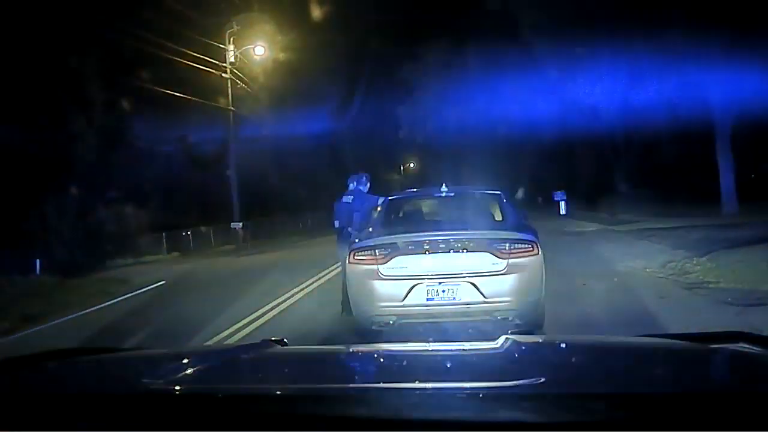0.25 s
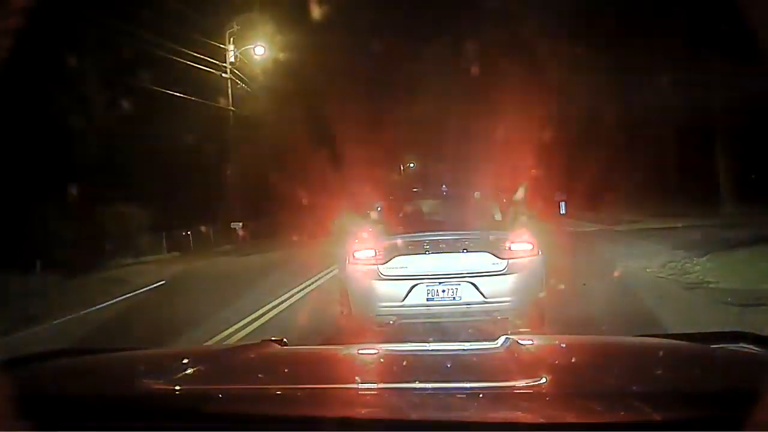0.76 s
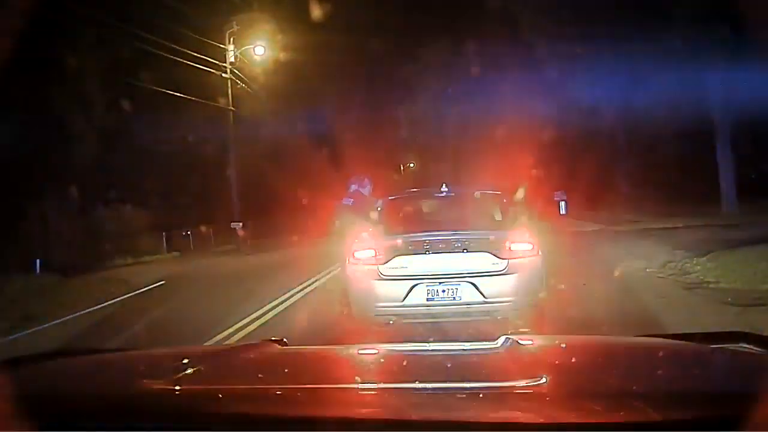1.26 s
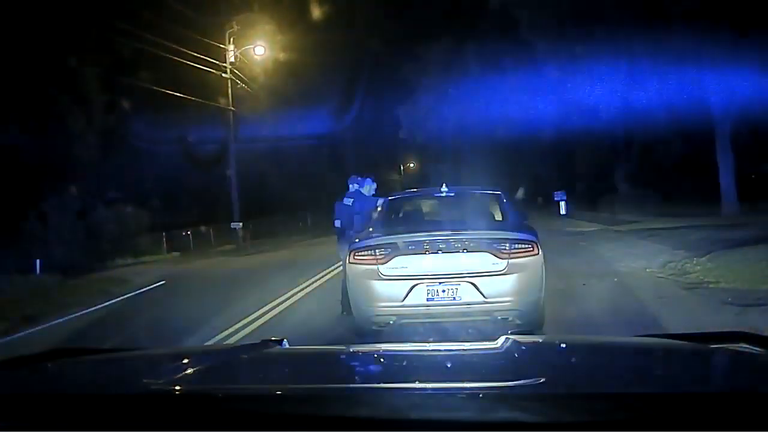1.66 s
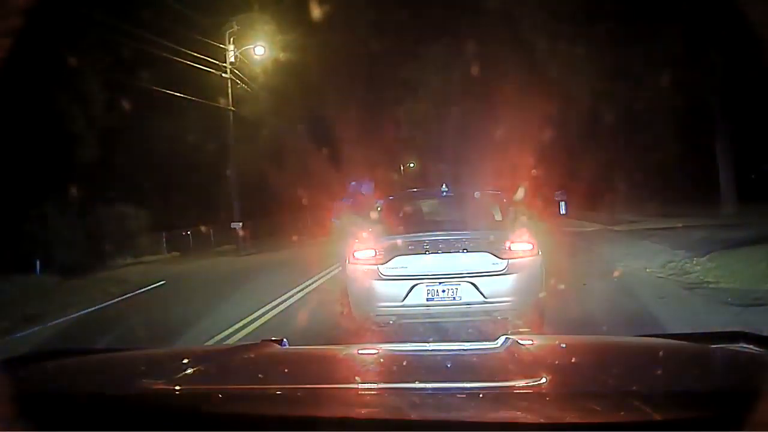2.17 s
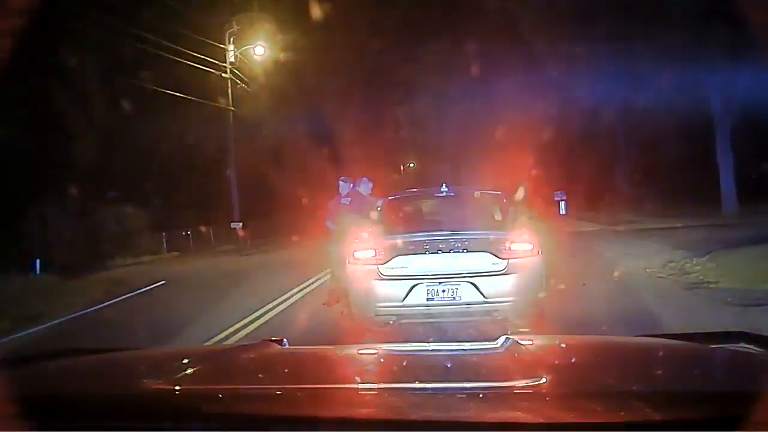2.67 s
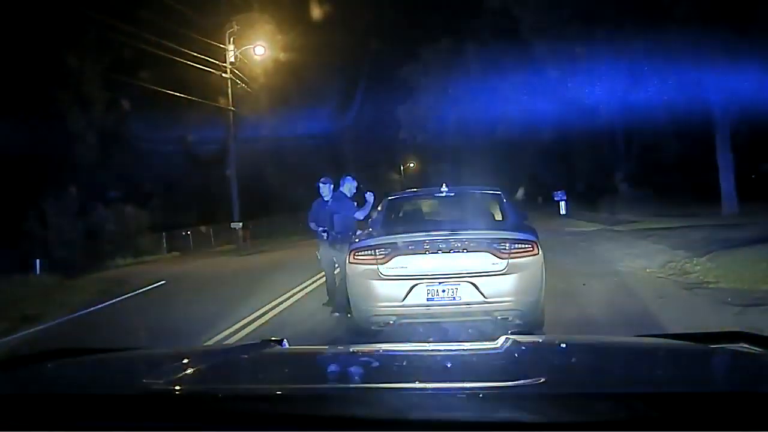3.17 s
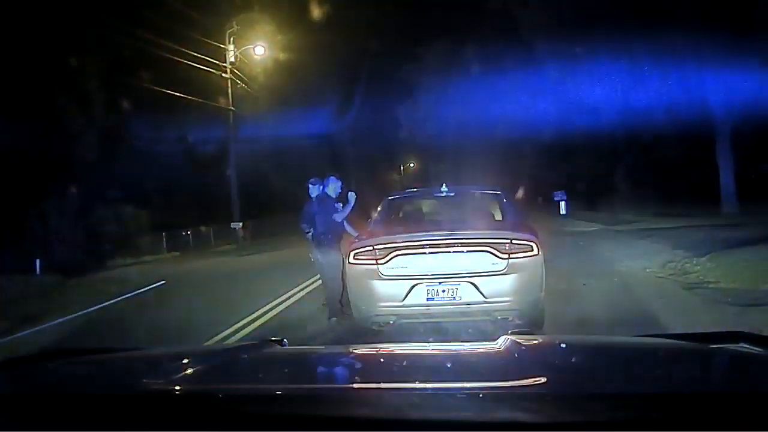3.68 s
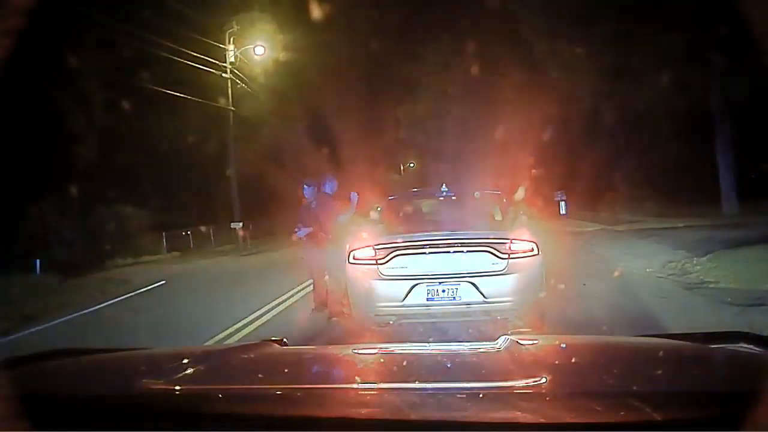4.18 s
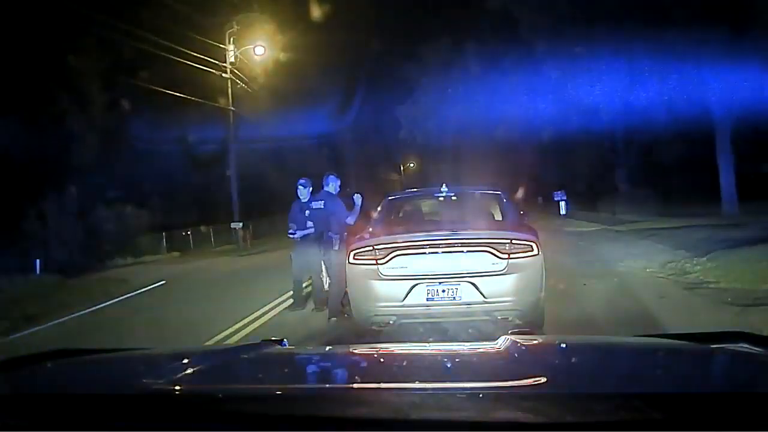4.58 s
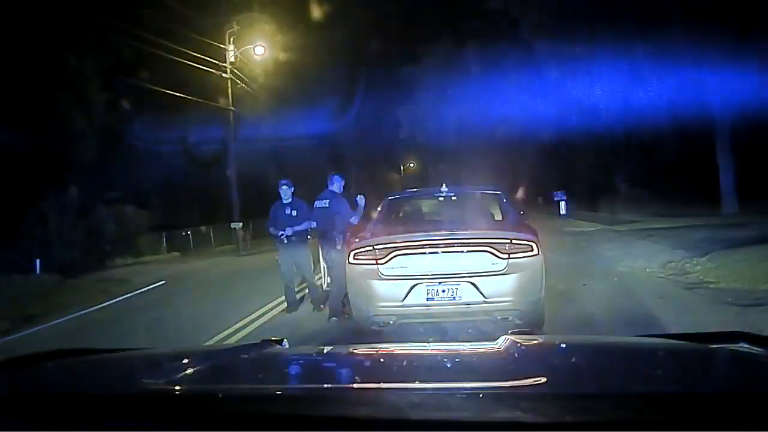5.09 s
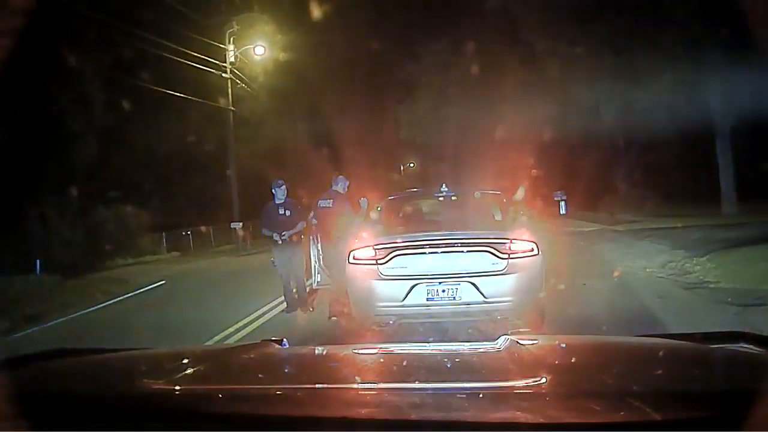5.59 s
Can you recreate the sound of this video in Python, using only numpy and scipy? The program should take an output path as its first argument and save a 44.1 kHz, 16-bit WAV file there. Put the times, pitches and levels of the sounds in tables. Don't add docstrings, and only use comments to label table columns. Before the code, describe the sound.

The sound sits entirely in the right channel, the left silent, from a microphone inside a small, padded car cabin. A low idling engine boom of about 30 Hz, soft body rumble and faint hiss run throughout. Light ticks at 0.23 and 0.26 s precede a very loud door slam at 0.3 s: latch crack, deep thump flattened by overload, panel ring and rattling rebounds, dying by about 0.6 s, with a low pressure swell fading after it. From 1.2 to 1.6 s keys chink almost inaudibly. A dull seat knock comes at 1.7 s, then latch clicks and trim raps from 2.2 s, with a strong bouncing thud at 2.56 s. Around 3.3 to 4.3 s, shuffling lifts the rumble amid muffled knocks and crisp buckle snaps, clearest near 3.4, 3.8 and 4.3 s. Weak knocks and ticks remain around 4.7 to 4.9 s, a last tiny tick at 5.5 s, then only the idle.

```python
import sys
import numpy as np
from scipy import signal
from scipy.fft import rfft, irfft
from scipy.io import wavfile
from scipy.ndimage import uniform_filter1d

SR = 44100
rng = np.random.default_rng(int(sys.argv[2]) if len(sys.argv) > 2 else 0)


def field_ratio(decibels):
    return 10 ** (np.asarray(decibels, dtype=float) / 20)


def int16_out(signal):
    q = np.round(np.clip(np.atleast_2d(signal).T, -1, 1) * 32767)
    wavfile.write(sys.argv[1], SR, q.astype(np.int16))


N = 257984
T = np.arange(N) / SR
SHORT = 16384


def unit(x):
    return x / np.sqrt(np.mean(x ** 2))


def decay(t, t60):
    return np.exp(-np.log(1000) * t / t60)


def hump(x, hz, octaves):
    f = np.maximum(np.fft.rfftfreq(len(x), 1 / SR), 1)
    bell = 1 / (1 + (np.log2(f / hz) / octaves) ** 2) ** 2
    return irfft(rfft(x) * bell, len(x))


def add(out, s, sound, peak_db):
    i = int(s * SR)
    n = min(len(sound), N - i)
    out[i:i + n] += field_ratio(peak_db) * sound[:n] / np.abs(sound).max()


def walk(rate):
    k = int(SR / rate)
    steps = np.repeat(rng.standard_normal(N // k + 1), k)
    return 1.3 * uniform_filter1d(uniform_filter1d(steps, k), k)[:N]


def tail(t, hz, bright_db, chatter_s, ring_s):
    after = np.maximum(t - chatter_s, 0)
    grain = np.repeat(rng.standard_normal(len(t) // 64), 64)
    noise = rng.standard_normal(len(t)) * field_ratio(1.8 * grain)
    scatter = np.repeat(rng.standard_normal(len(t) // 64), 64)
    clumps = uniform_filter1d(scatter, size=48)[:len(t) // 2 + 1]
    noise = irfft(rfft(noise) * field_ratio(2.8 * clumps), len(t))
    dull = unit(hump(noise, 897, 0.97)) * decay(after, 1.16 * ring_s)
    ringing = unit(hump(noise, hz, 0.07)) * decay(after, 0.7 * ring_s)
    bright = unit(hump(noise, 2530, 1.33)) * decay(after, 0.45 * ring_s)
    bright = bright * (1 + 0.64 * decay(t, 0.061))
    onset = 1 - np.exp(-t / 0.0007)
    return (dull + 0.45 * ringing + field_ratio(bright_db + 3) * bright) * onset


# pitch in Hz, level in dB, decay t60 in seconds.
BODY_MODES = [(53.26, 2, 0.41), (66, 0, 0.59), (86.35, -2, 0.71), (102.64, -2, 0.66), (122, -1, 0.45),
              (133.6, 0.5, 0.27), (166.7, -3.5, 0.41), (186, 0, 0.44), (214.9, -1.5, 0.46),
              (241.1, 1, 0.44), (274.7, -11.5, 0.92), (308, -1, 0.23), (334.4, -5, 0.47), (385, -4.5, 0.32),
              (440, -5.5, 0.18), (470.7, -7.5, 0.37), (573.3, -10.5, 0.34), (683.7, -11.5, 0.25),
              (700, -5.5, 0.074), (779.7, -7, 0.27), (1007, 0.5, 0.13)]


def blows(rows, octaves, crack_db, rise_s, size):
    out, t = np.zeros(N), T[:size]
    hz, db, t60 = np.transpose(BODY_MODES)[:, :, None]
    for s, peak_db, centre_hz, ring in rows:
        chance = rng.standard_normal((3, len(BODY_MODES), 1))
        nearness = 1 / (1 + (np.log2(hz / centre_hz) / octaves) ** 2) ** 2
        share = field_ratio(db + 2.01 * chance[0]) * nearness
        tuned_hz = hz * (1 + 0.01174 * chance[1])
        modes = share * np.sin(2 * np.pi * tuned_hz * t + 0.72 * chance[2])
        modes = modes * (decay(t, ring * t60) + 0.053 * decay(t, 4.2 * ring * t60))
        add(out, s, modes.sum(axis=0) * (1 - np.exp(-t / rise_s)), peak_db)
        crack = tail(t[:SHORT], 600 + 1.214 * centre_hz, -44, 0.0054, 0.27 * ring)
        add(out, s, crack, peak_db + crack_db)
    return out


# start in seconds, peak in dB, centre pitch in Hz, ring as a share of the body's t60.
DOOR_THUMPS = [
    (.3205, 5, 109.2, 0.48),
    (.333, 2, 63.6, .75),
    (.346, -6.5, 200, 0.51),
    (.374, -6.5, 69, 0.64),
    (.398, -6, 120, 0.53),
    (.443, -11, 116, 0.61),
    (.518, -21, 100, 0.87),
    (.62, -29, 66, 1),
]
# start in seconds, peak in dB, centre pitch in Hz, ring as a share of t60.
LATCH_RATTLE = [
    (.232, -36, 393, 0.32),
    (.259, -29.5, 330, 0.43),
    (.302, -17, 626, 0.59),
    (.309, -11.5, 440, 0.19),
    (.324, -5.5, 635, 0.48),
    (.358, -4.5, 530, 0.38),
    (.385, -12, 427, 0.81),
    (.41, -23, 534, 0.41),
]


def door():
    thumps = blows(DOOR_THUMPS, octaves=1.32, crack_db=-21.5, rise_s=0.0023, size=2 * SHORT)
    rattle = blows(LATCH_RATTLE, octaves=0.73, crack_db=-11, rise_s=0.0028, size=SHORT)
    return thumps + rattle


def bounces(rows):
    hits = []
    for s, peak_db, hz, ring, loss_db in rows:
        hits.append((s, peak_db, hz, ring))
        if loss_db < 12:
            hits.append((s + 3 / hz, peak_db - loss_db, hz, ring))
    return hits


# start in seconds, peak in dB, centre pitch in Hz, ring as a share of t60,
# loss at the first bounce in dB.
SEAT_KNOCKS = [(1.683, -22, 110, 0.28, 20), (2.237, -30, 200, 0.25, 20), (2.56, -12.5, 146, 0.84, 3),
               (2.6, -23.5, 70.5, .8, 21), (2.601, -23.5, 179, 0.92, 20), (2.711, -29, 183, 0.75, 20),
               (3.313, -32, 168, 0.22, 20), (3.369, -28, 119.3, 0.92, 0), (3.612, -19, 125.2, 0.38, 3.5),
               (3.665, -26.5, 182, 0.32, 10), (3.949, -28, 96.4, 0.62, 14), (3.99, -29, 102, 0.53, 13),
               (4.167, -18, 122, .33, -1), (4.235, -27.5, 110, 0.44, 20), (4.348, -33, 106, 0.28, 20),
               (4.726, -28.5, 122, 0.33, 20)]
# start in seconds, peak in dB, centre pitch in Hz, ring as a share of t60.
TRIM_RAPS = [(2.239, -27, 562, 0.21), (2.27, -35.5, 440, .25), (2.557, -27, 493, 0.83),
             (2.572, -18.5, 385, 0.18), (2.59, -34.5, 700, .98), (2.712, -26, 424, 0.3),
             (2.781, -39, 500, 0.71), (3.372, -35, 540, 0.61), (3.63, -32.5, 416, .4), (4.168, -39, 950, 1),
             (4.185, -32.5, 385, 0.61), (4.4, -41.5, 475, .4), (4.727, -46, 600, .3), (4.9, -39, 504, 0.49),
             (5.495, -43, 750, 0.17)]


def trim():
    knocks = blows(bounces(SEAT_KNOCKS), octaves=0.51, crack_db=-22.5, rise_s=0.0071, size=SHORT)
    raps = blows(TRIM_RAPS, octaves=0.51, crack_db=-14, rise_s=0.0013, size=SHORT)
    return knocks + raps


# start in seconds, peak in dB, ringing pitch in Hz, chatter in seconds.
BUCKLE_SNAPS = [(2.3473, -33.5, 1667, 0.017), (2.3581, -34.5, 1400, .013), (2.558, -36, 1120, .019),
                (2.6788, -35.5, 1320, 0.02), (3.091, -51.5, 1190, 0.031), (3.3813, -38.5, 1170, .025),
                (3.3907, -27.5, 1866, 0.013), (3.4083, -32.5, 1380, .0066), (3.4247, -44.5, 1270, .015),
                (3.5748, -37, 1230, 0.022), (3.6118, -38, 1910, 0.017), (3.8086, -37, 1480, 0.031),
                (3.8259, -26, 1467, 0.014), (3.8546, -42.5, 1590, .014), (3.952, -42, 1340, 0.026),
                (4.2792, -32, 2010, 0.032), (4.3067, -27.5, 1990, 0.012), (4.463, -51, 1930, .015),
                (4.7267, -41, 1280, 0.025)]
# start in seconds, peak in dB, brightness in dB.
PLASTIC_TICKS = [(2.3747, -43, -22), (2.579, -37.5, -22), (2.6484, -44, -14), (2.7144, -42, -16),
                 (3.1547, -43, -30), (3.46, -42, -18), (3.73, -43.5, -35), (4.1638, -48, -8),
                 (4.24, -45, -35), (4.335, -53.5, -2), (4.59, -56, -1), (4.704, -51, -20),
                 (4.786, -48.5, -20), (5.494, -54, -35)]


def clicks():
    out, t = np.zeros(N), T[:SHORT]
    for s, peak_db, hz, chatter_s in BUCKLE_SNAPS:
        add(out, s, tail(t, hz, bright_db=-7, chatter_s=chatter_s, ring_s=0.17), peak_db)
    for s, peak_db, bright_db in PLASTIC_TICKS:
        add(out, s, tail(t, 1219, bright_db, chatter_s=0.012, ring_s=0.12), peak_db)
    return out


# start in seconds, peak in dB, resonance in Hz, blur in octaves.
KEY_CHINKS = [(1.215, -62, 3050, .06), (1.23, -60, 3000, .3), (1.35, -63, 2700, .25),
              (1.43, -61, 2900, .25), (1.5, -63, 2900, .25), (1.24, -60, 2330, .04),
              (1.245, -63, 3500, .14), (1.285, -63, 2330, .03), (1.31, -58, 1080, .04),
              (1.335, -60, 2440, .025), (1.365, -65, 2430, .04), (1.385, -66, 2980, .03),
              (1.405, -60, 2440, .025), (1.438, -56, 3000, .015), (1.465, -62, 3680, .02),
              (1.47, -61, 2430, .03), (1.557, -55, 3240, .02), (2.24, -49, 2150, .14),
              (2.685, -45, 2150, .1), (4.462, -58, 1920, .1)]


def keys():
    out, t = np.zeros(N), T[:SHORT]
    swell = decay(t, 0.11) * (1 - np.exp(-t / 0.012))
    for s, peak_db, hz, blur in KEY_CHINKS:
        scrape = hump(rng.standard_normal(len(t)), hz, blur)
        add(out, s, scrape * swell, peak_db - 2)
    return out


def boom():
    door_shuts_s, pump_rise_s, pump_hold_s, pump_t60_s = 0.3095, 0.038, 0.077, 0.48
    idle_hz, sag_hz, recover_s = 30.3, 2.8, 0.35
    since = T - door_shuts_s
    settled = np.maximum(since - pump_hold_s, 0)
    phase = 2 * np.pi * np.cumsum(idle_hz - sag_hz * np.exp(-settled / recover_s)) / SR
    swing = field_ratio(-40) * np.exp(np.minimum(since, 0) / 0.077)
    pump = field_ratio(-14) * np.clip(since / pump_rise_s, 0, 1)
    level = field_ratio(-44.5) + (swing + pump) * decay(settled, pump_t60_s)
    return np.sqrt(2) * level * field_ratio(0.5 * walk(13)) * np.sin(phase)


# pitch in Hz, level in dB per Hz.
RUMBLE_COLOUR = [(24, -17), (40, -8.5), (54, -10), (102, -0.5), (138, -9), (204, -2.5), (228, -14),
                 (265, -11.5), (302, -16), (431, -14.5), (559, -23.5), (1160, -41), (1270, -41),
                 (1510, -45.5), (3500, -60), (4550, -55.5), (7700, -120)]
# time in seconds, stir in dB.
SEAT_SHUFFLE = [(0, 6), (.7, 8.5), (1, 4.5), (1.4, 7.5), (1.9, 7), (2.45, 9), (3.2, 4.5), (3.5, 13),
                (3.72, 14), (3.8, 14), (4, 12), (4.6, 6), (5.85, 4.5)]


def rumble():
    mids_db = np.interp(T, *np.transpose(SEAT_SHUFFLE))
    lows_db = 0.14 * mids_db
    hz, db = np.transpose(RUMBLE_COLOUR)
    f = np.maximum(np.fft.rfftfreq(N, 1 / SR), 1)
    shaped = rfft(rng.standard_normal(N)) * field_ratio(np.interp(np.log(f), np.log(hz), db))
    shaped = shaped / np.sqrt(np.mean(irfft(shaped, N) ** 2))
    out, shared = 0, walk(5.044)
    for centre in 40 * 2 ** np.arange(0, 7, 1 / 3):
        band = irfft(shaped * np.clip(1 - 3 * np.abs(np.log2(f / centre)), 0, 1), N)
        mid_share = np.clip(np.log2(centre / 300) / 2, 0, 1)
        stir_db = lows_db + mid_share * (mids_db - lows_db)
        out = out + band * field_ratio(stir_db + 0.9 * shared + 1.2 * walk(9))
    return out * field_ratio(-42.5)


def hiss():
    white = rng.standard_normal(N + 1)
    return unit(white[1:] - 0.023 * white[:-1]) * field_ratio(-64.5)


def scene():
    cabin = door() + trim() + clicks() + keys() + boom() + rumble() + hiss()
    return np.array([0 * cabin, 2 * cabin])


def low_pass(x):
    return signal.sosfilt(signal.butter(12, 11130, fs=SR, output="sos"), x)


def record(dry):
    clipped = np.clip(dry, -0.99, 0.99)
    steep = signal.ellip(10, 0.3, 60, 10950, fs=SR, output="sos")
    band = signal.sosfilt(steep, clipped)
    return low_pass(np.clip(band, -1, 1))


dry = scene()
out = record(dry)
int16_out(out)
```